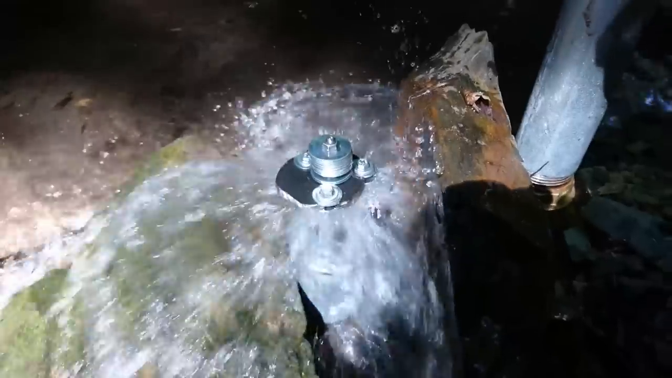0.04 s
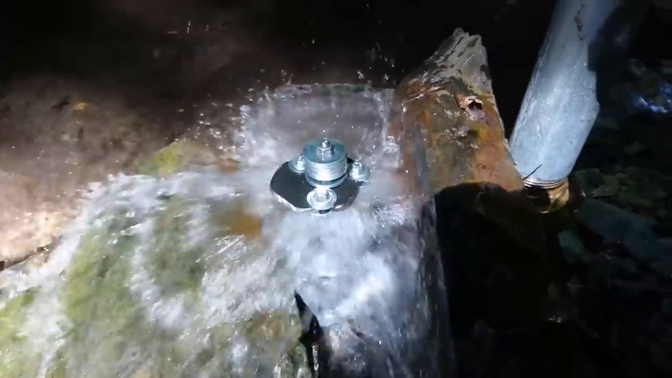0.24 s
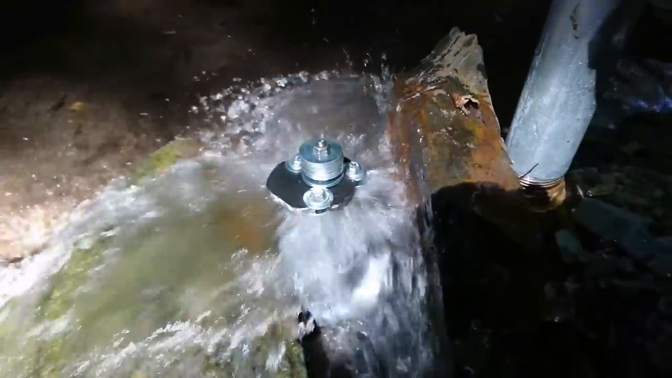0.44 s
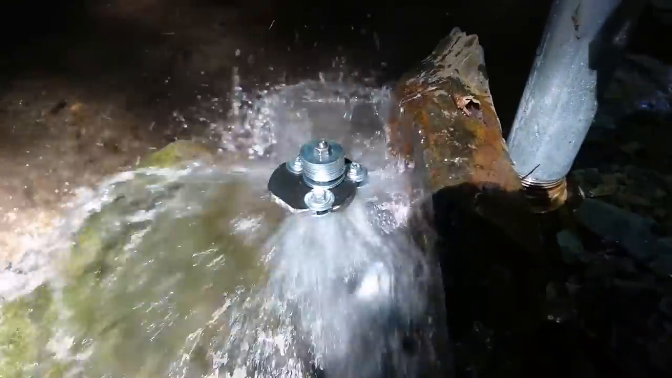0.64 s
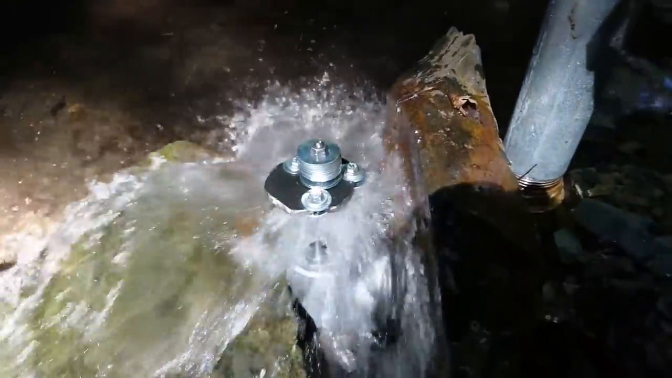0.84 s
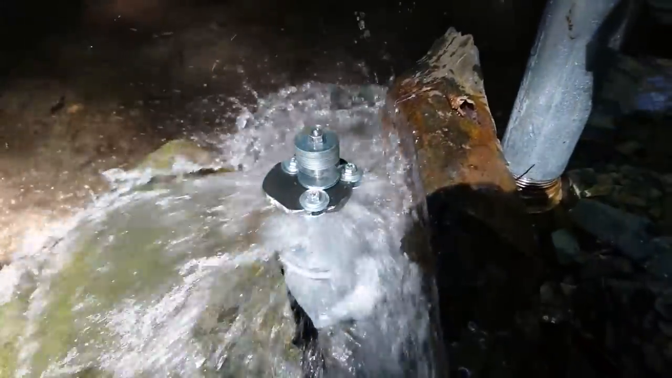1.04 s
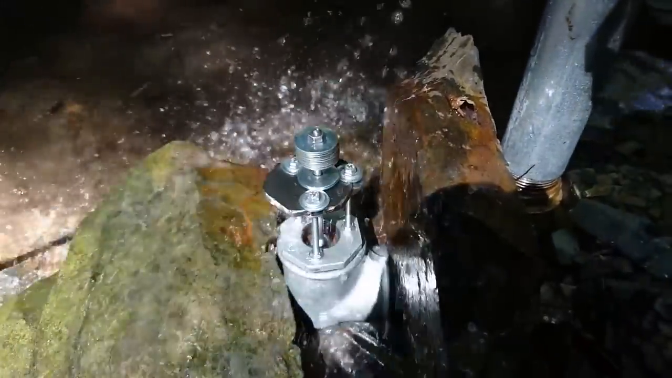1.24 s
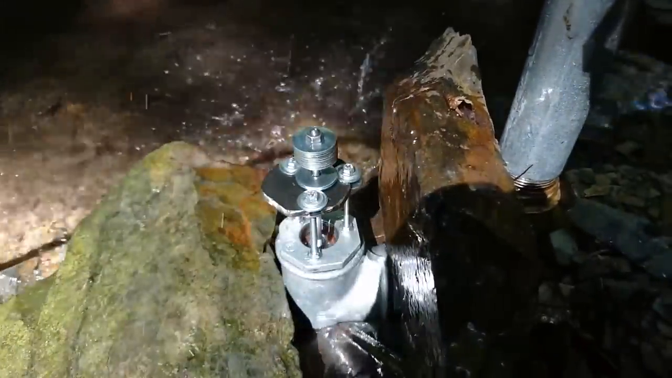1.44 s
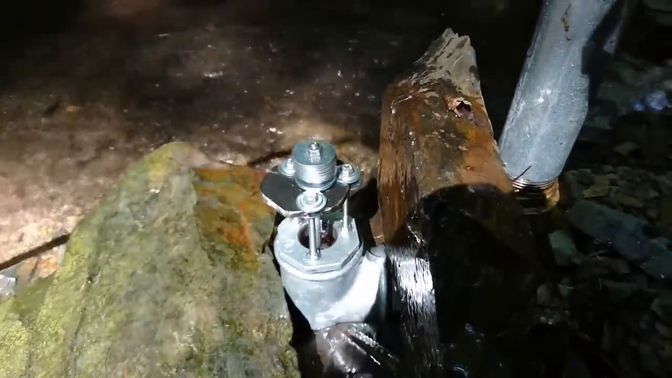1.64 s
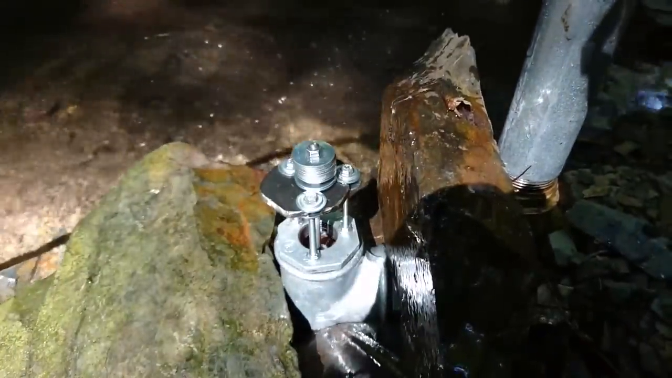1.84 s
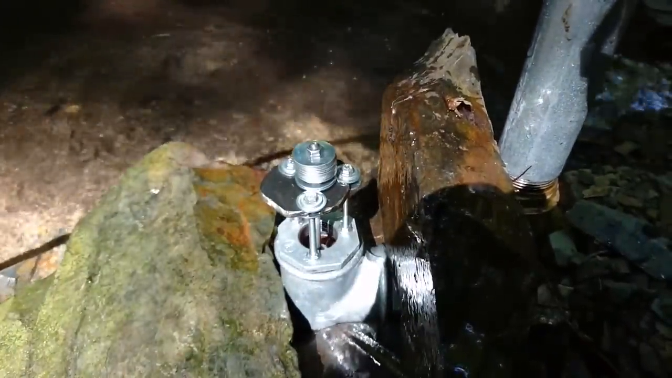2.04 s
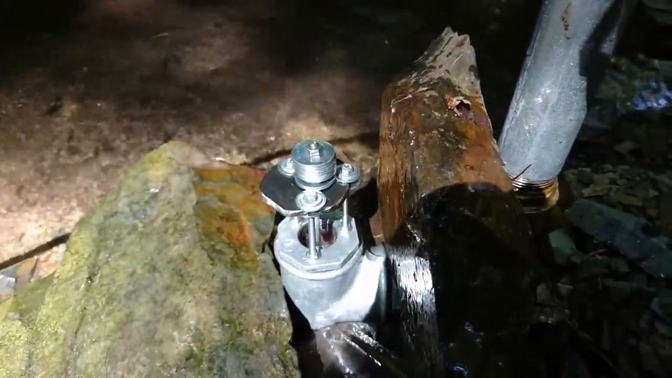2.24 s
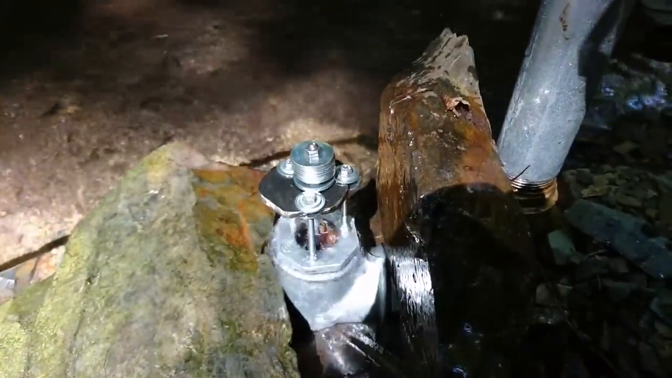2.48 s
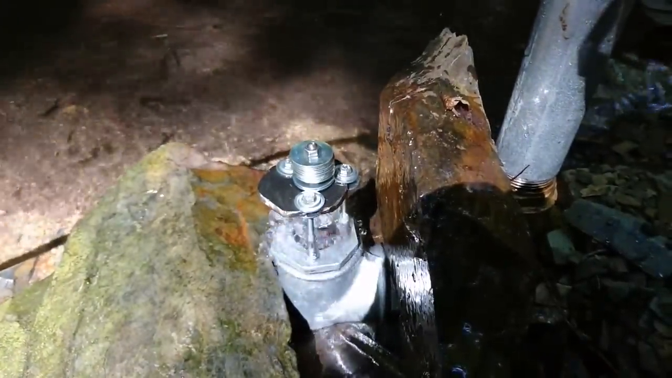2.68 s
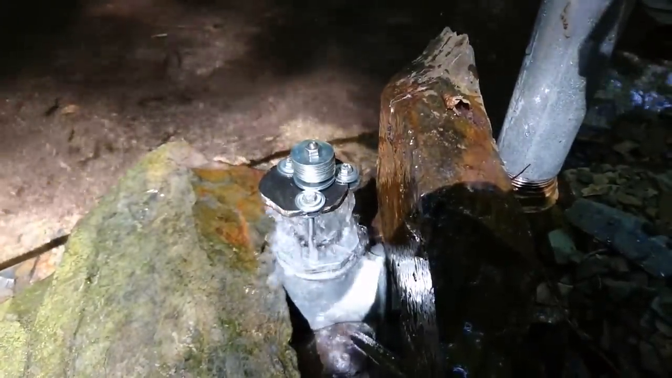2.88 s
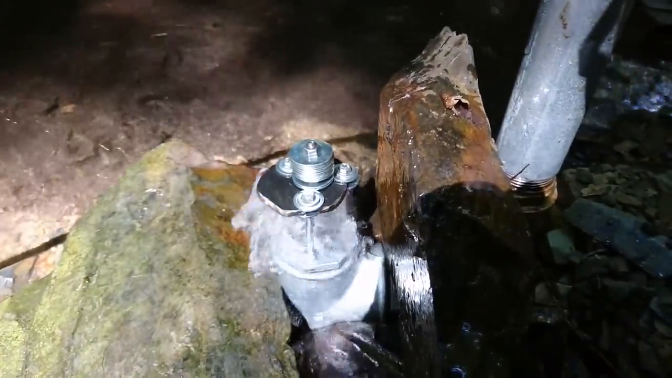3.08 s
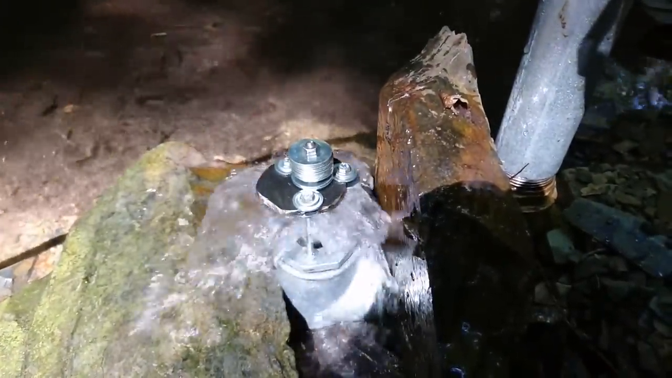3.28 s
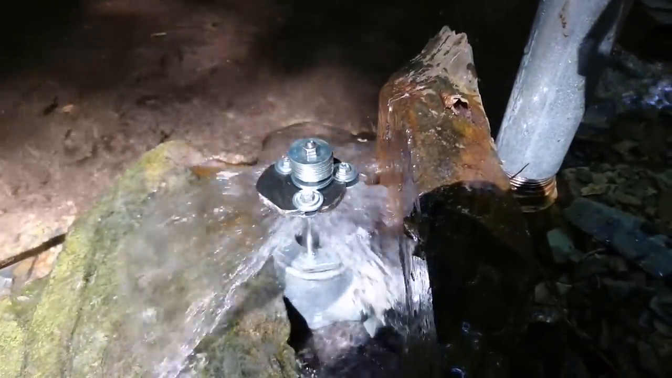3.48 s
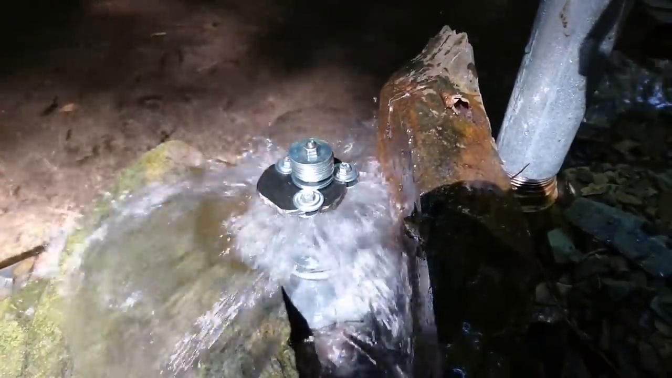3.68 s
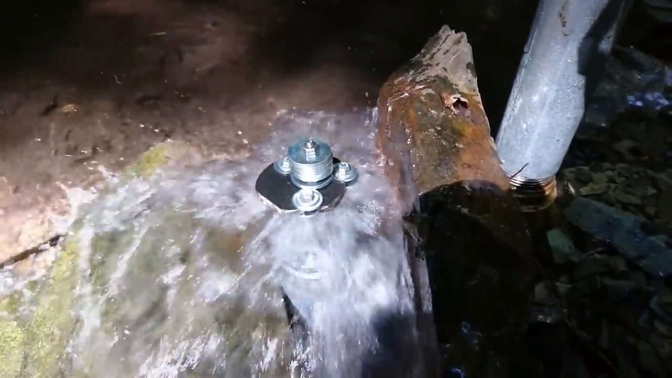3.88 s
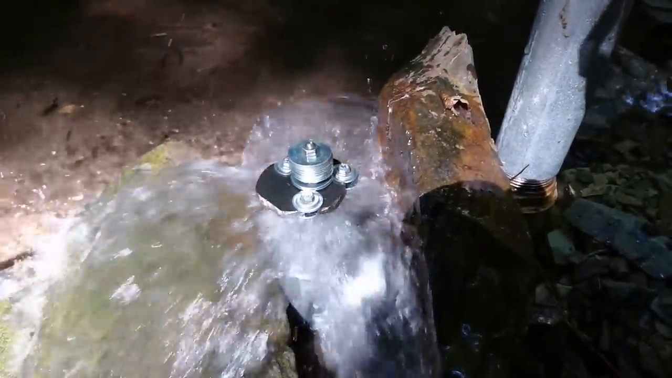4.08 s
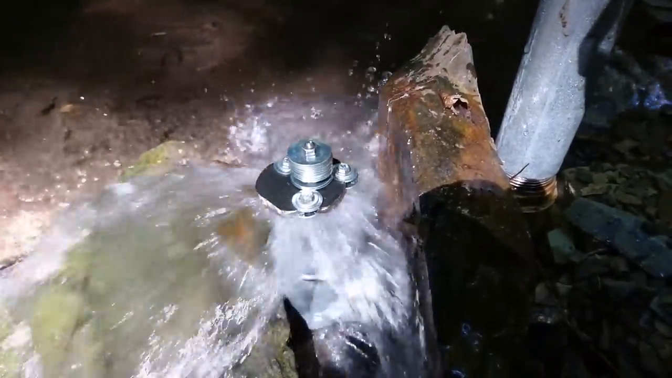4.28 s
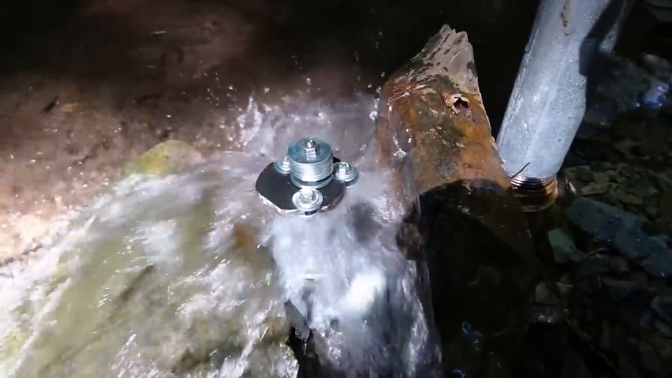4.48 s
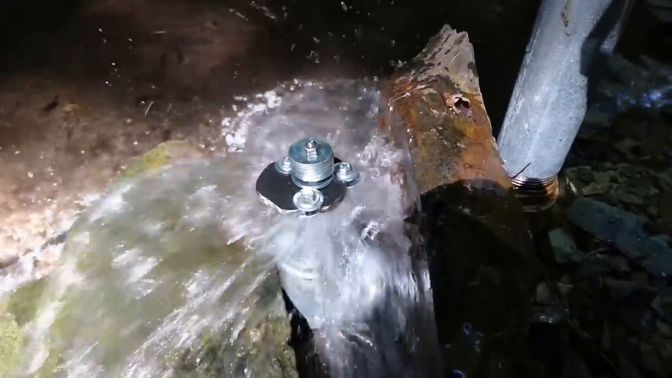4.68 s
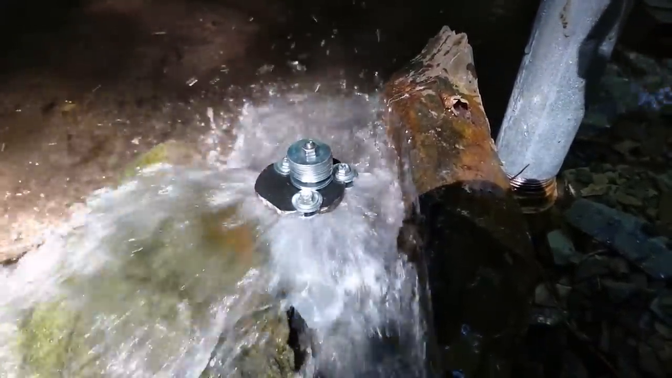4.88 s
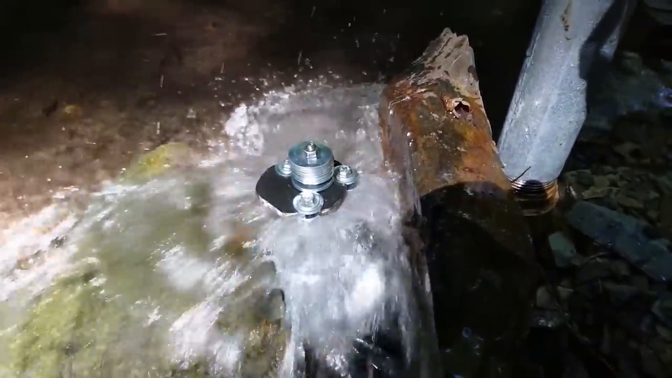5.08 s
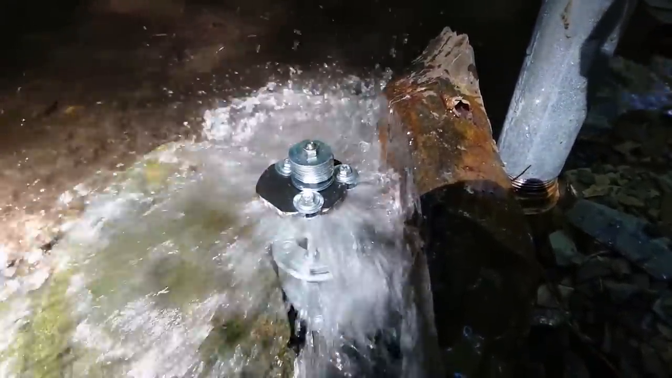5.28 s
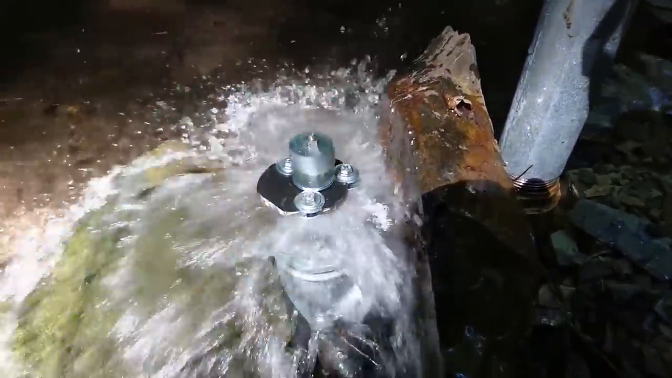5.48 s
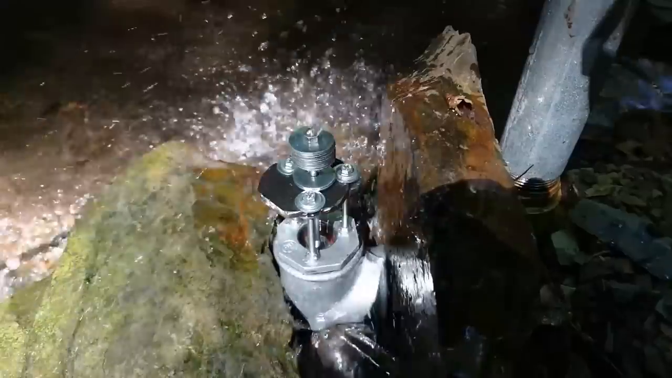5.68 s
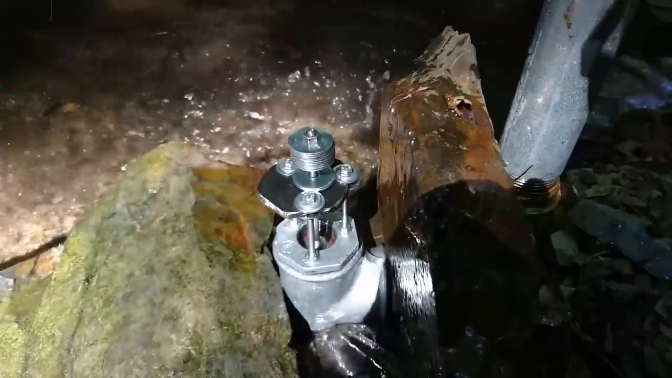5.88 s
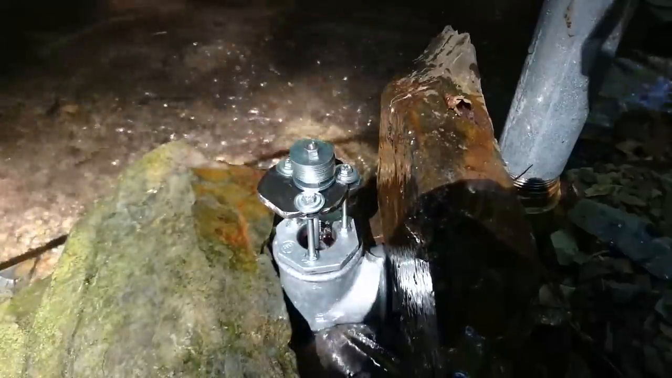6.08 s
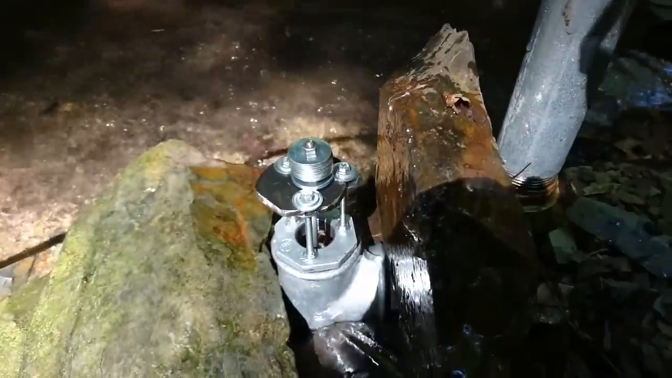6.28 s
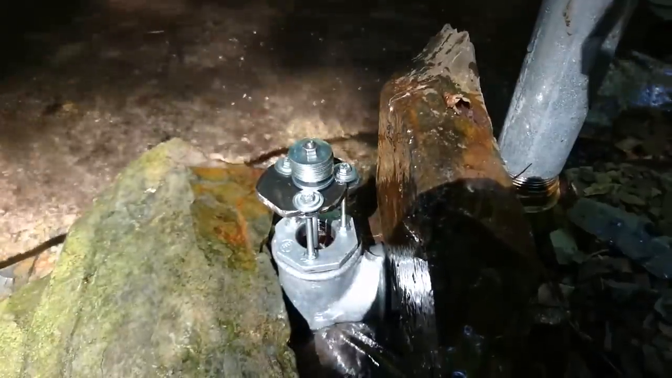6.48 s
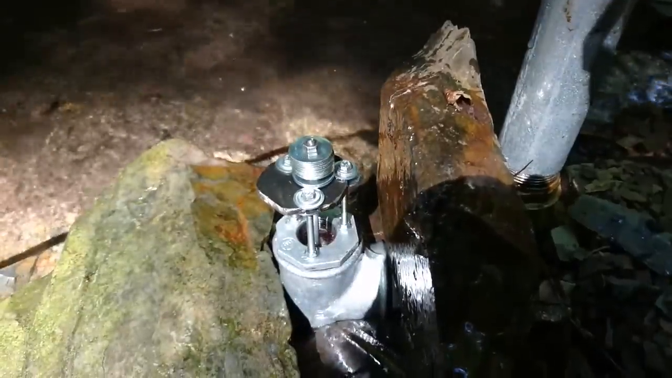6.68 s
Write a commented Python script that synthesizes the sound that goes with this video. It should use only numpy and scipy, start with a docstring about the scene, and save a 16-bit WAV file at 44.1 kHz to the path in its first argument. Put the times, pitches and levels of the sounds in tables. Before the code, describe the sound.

A pump valve spews hissing, splashing water, knocks shut with a thump and gulp, rattles open in near quiet, then repeats the cycle.

```python
"""Beside a creek: a ram pump gushes over stones until its waste valve slams shut with a knock, thump and gulp.
The spray falls back, loose weights clatter on the stem as the valve drops open, and the gush builds again.
Water is filtered noise and ringing impacts, bubbles are rising sines, metal is a set of struck resonances.
Rumble, murmur and a wandering hum lie below. Two small microphone ports listen, the left nearer the valve."""
import sys
import numpy as np
from scipy import signal
from scipy.fft import rfft, irfft, next_fast_len
from scipy.io import wavfile
from scipy.ndimage import uniform_filter1d

SR = 44100
rng = np.random.default_rng(int(sys.argv[2]) if len(sys.argv) > 2 else 0)


def master_out(mix):
    """Clip the mix to full scale and print it as 16-bit PCM to the path in sys.argv[1]."""
    frames = np.transpose(np.atleast_2d(mix))
    ceiling = np.clip(frames, -1, 1)
    pcm = np.round(ceiling * 32767).astype(np.int16)
    wavfile.write(sys.argv[1], SR, pcm)


N = 296572  # length in samples

# Surges and lulls of the gush, before its random surging: [t/s, spray level/dB, gurgle level/dB]
GUSH_CURVE = [(0.0, -36, -36.5), (0.15, -37, -42), (0.3, -37, -40), (0.47, -38.5, -41), (0.65, -36, -43),
              (0.75, -37, -42.5), (0.99, -34.5, -36), (1.1, -34.5, -40.5), (1.19, -39.5, -39.5),
              (1.3, -37, -50), (1.36, -44, -52), (1.43, -54.5, -57.5), (1.65, -59.5, -53.5),
              (1.85, -63, -60), (2.1, -70, -64.5), (2.56, -71.5, -65.5), (2.68, -61.5, -58),
              (2.74, -60.5, -49.5), (2.9, -56.5, -52.5), (3.0, -55.5, -50), (3.19, -53.5, -48),
              (3.27, -47, -43), (3.38, -49, -47), (3.45, -48.5, -50), (3.53, -46.5, -48),
              (3.66, -50.5, -51), (3.8, -43, -44.5), (3.93, -42.5, -46.5), (4.0, -39, -46.5),
              (4.25, -40.5, -42.5), (4.38, -36.5, -42.5), (4.47, -37.5, -38), (4.56, -39.5, -42.5),
              (4.8, -35, -42), (4.98, -41, -44), (5.04, -34.5, -39), (5.25, -37, -44.5),
              (5.45, -34.5, -39.5), (5.58, -32.5, -42), (5.64, -38.5, -52), (5.79, -40.5, -47),
              (5.84, -49, -60), (5.95, -62, -58), (6.1, -57.5, -54), (6.28, -64, -63), (6.45, -70, -68),
              (6.72, -69, -63.5)]
# Short dips in the spray level, of one common width: [t/s, depth/dB]
SPRAY_DIPS = [(.01, 4), (.13, 3), (.472, 4.5), (.79, 4.5), (1.07, 4), (1.177, 2), (1.225, 4), (1.385, 6),
              (1.455, 5), (2.888, 4), (3.003, 4), (3.043, 3), (3.12, 6), (3.183, 7), (3.407, 3), (3.437, 7),
              (3.672, 3), (3.776, 4.5), (3.831, 3.5), (3.906, 4), (3.963, 3), (4.036, 6), (4.115, 3.5),
              (4.25, 3), (4.35, 4), (4.605, 2), (5.068, 3.5), (5.203, 2.5), (5.363, 5), (5.478, 4),
              (5.69, 5), (5.828, 5)]
# Colour of the water itself: [f/Hz, level/dB]
WATER_COLOUR = [(400, 4.5), (1500, 1.5), (4000, 1), (8000, 3.5), (11000, 3.5), (15000, 11)]
# Low sound of creek and pipe, before its drift: [t/s, rumble level/dB, murmur level/dB]
LOW_CURVE = [(0.0, -63, -61.5), (0.32, -70, -61.5), (0.65, -60, -59.5), (0.95, -65, -63),
             (1.25, -54.5, -60.5), (1.8, -59, -63), (2.4, -61.5, -64.5), (2.85, -65.5, -61.5),
             (3.4, -55, -57.5), (4.05, -60, -57), (4.55, -64, -58), (4.95, -63, -61), (5.3, -61.5, -56.5),
             (5.62, -57.5, -62), (5.95, -67.5, -62), (6.3, -59, -60), (6.72, -60.5, -60)]
# Spectral shape of the rumble, loudness set later: [f/Hz, relative level/dB]
RUMBLE_COLOUR = [(30, -70), (50, 1.5), (95, 6.5), (170, 1.5), (260, -2.5), (340, -48.5)]
# Spectral shape of the murmur, loudness set later: [f/Hz, relative level/dB]
MURMUR_COLOUR = [(200, -15.5), (300, -2.5), (420, 2.5), (650, 1), (850, -7), (1100, -21), (1600, -29),
                 (2200, -47)]
# Wandering hum, before its swelling: [t/s, f/Hz, level/dB]
HUM_CURVE = [(0, 85, -78), (.4, 85.6, -70), (.7, 105, -57), (.95, 99.6, -81), (1.17, 100, -55),
             (1.3, 79.3, -57), (1.6, 100, -71), (1.75, 107.2, -57), (1.88, 89.8, -61), (2.05, 97.2, -59),
             (2.35, 85.8, -59), (2.55, 100, -66), (2.75, 74.9, -67), (2.9, 90.2, -73), (3.05, 96.4, -65),
             (3.4, 94.6, -60), (3.55, 107.1, -59), (3.75, 94.6, -71), (3.95, 95, -53.5), (4.15, 110.2, -70),
             (4.35, 108.6, -56.5), (4.55, 117.2, -70), (4.9, 85.6, -71), (5.08, 82, -57.5),
             (5.35, 106, -58.5), (5.6, 85.6, -70), (5.9, 89.2, -75), (6.33, 86.7, -67), (6.45, 92, -73),
             (6.55, 99.4, -63), (6.72, 118, -68)]
# Loudest bubbles and gulps, with a few pitched splashes: [t/s, level/dB, starting f/Hz, t60/s]
LOUD_BUBBLES = [(0.059, -27.5, 1480, 0.024), (0.1, -47, 1020, 0.14), (0.025, -22, 3470, .02),
                (0.358, -27, 4400, .03), (0.412, -20.5, 1480, 0.011), (0.504, -30, 1500, 0.02),
                (0.533, -31.5, 1100, 0.035), (0.581, -25, 2200, 0.017), (0.664, -22, 6230, 0.012),
                (0.674, -19.5, 2650, .04), (0.684, -24, 4450, .015), (0.727, -31, 1530, .022),
                (0.738, -37.5, 900, 0.03), (0.8116, -23.5, 4700, 0.013), (0.979, -31, 1630, 0.07),
                (1.047, -19.5, 1520, 0.022), (1.293, -34, 1650, 0.02), (1.408, -54, 1460, 0.046),
                (1.504, -46, 1290, 0.06), (1.522, -50, 1310, .06), (1.57, -48, 1500, 0.043),
                (1.681, -27, 856, 0.037), (1.735, -42, 900, 0.078), (1.755, -40.5, 850, .029),
                (2.046, -54, 1100, 0.046), (2.319, -42.5, 1000, 0.023), (2.323, -45, 1454, 0.031),
                (2.358, -52, 940, .05), (2.729, -43, 970, 0.046), (2.736, -40, 1500, .055),
                (2.754, -44, 1010, 0.059), (2.832, -49, 700, .03), (2.85, -50, 1610, .025),
                (2.986, -42, 2100, 0.013), (3.038, -47, 1020, .035), (3.091, -41.5, 1544, 0.075),
                (3.112, -44, 1480, 0.052), (3.11, -47, 990, 0.046), (3.165, -47, 1000, 0.043),
                (3.176, -42, 1130, 0.04), (3.182, -44, 1500, 0.027), (3.301, -40, 1500, 0.048),
                (3.33, -51, 1450, .04), (3.482, -40.5, 1615, 0.026), (3.72, -40.5, 1660, .03),
                (3.858, -29.5, 1639, 0.033), (3.898, -45, 1021, 0.12), (3.929, -34.5, 1580, 0.036),
                (4.018, -33.5, 1340, 0.026), (4.166, -31, 1382, 0.016), (4.318, -26, 1320, 0.0077),
                (4.371, -33, 1730, 0.029), (4.403, -30.5, 1920, 0.026), (4.489, -36, 703, 0.047),
                (4.763, -37, 1750, 0.045), (5.081, -29.5, 1570, 0.028), (5.122, -34, 1540, .061),
                (5.142, -29, 1566, 0.011), (5.248, -29, 1600, .028), (5.405, -37, 1500, 0.05),
                (5.492, -20, 1590, 0.01), (5.574, -26, 926, 0.048), (5.795, -34, 1120, 0.059),
                (5.962, -51, 1400, .03), (6.131, -30, 740, 0.022), (6.14, -45, 1300, 0.095),
                (6.435, -58, 1870, 0.046), (6.478, -56, 1900, 0.042)]
# Loudest splashes on the stones: [t/s, level/dB, f/Hz, left over right level/dB, t60/s]
LOUD_SPLASHES = [(0.0321, -14.5, 3830, 6.5, 0.023), (0.1189, -28, 5270, -1.0, 0.015),
                 (0.1778, -23, 7150, -1, 0.023), (0.2161, -20.0, 3280, 8, 0.024),
                 (0.2464, -18, 4740, -1.0, 0.024), (0.2571, -20.5, 4090, 1, 0.037),
                 (0.273, -16, 2950, 2, 0.014), (0.2955, -20, 4180, 0.0, 0.054),
                 (0.3039, -18, 4870, -5.0, 0.026), (0.321, -28, 3490, -0.5, 0.015),
                 (0.3446, -18.5, 4390, -2, 0.036), (0.3833, -16, 4050, -4, 0.014),
                 (0.412, -17.5, 3880, -1, 0.011), (0.4324, -21.5, 4840, 2.5, 0.04),
                 (0.4842, -20, 4050, -3, 0.05), (0.508, -17, 3880, 1.0, 0.016),
                 (0.5212, -20, 2630, 8, 0.013), (0.5326, -20, 2840, 4, 0.012),
                 (0.617, -11, 4500, -3, 0.015), (0.6581, -11, 3495, -2.5, 0.022),
                 (0.7222, -22, 7150, 2, 0.016), (0.7349, -21.0, 3700, 3, 0.039),
                 (0.7621, -25, 4950, -6, 0.012), (0.8154, -14.5, 4960, 1, 0.011),
                 (0.827, -23, 4260, -0.5, 0.018), (0.8982, -15, 4780, -3, 0.012),
                 (0.9134, -28, 6760, -1.5, 0.013), (0.9702, -19, 3570, 0, 0.012),
                 (1.0216, -17, 3730, 2.0, 0.052), (1.0489, -26, 2930, 3, 0.038),
                 (1.2109, -26, 3620, 0.5, 0.036), (1.2725, -23, 4670, -4.0, 0.032),
                 (1.2833, -21.0, 4260, -4, 0.012), (1.2967, -16.5, 4220, 0, 0.029),
                 (1.3056, -25, 4780, -3.0, 0.012), (1.3407, -23, 3270, 10, 0.012),
                 (1.3692, -27, 3380, 6, 0.014), (1.387, -38, 4950, -2.0, 0.012),
                 (1.405, -32, 2900, -5, 0.039), (1.4131, -28, 4750, -1.0, 0.02),
                 (1.4859, -30, 4050, -3, 0.014), (1.503, -28.5, 3160, -2.5, 0.027),
                 (1.5679, -43, 1940, -1.0, 0.038), (1.5756, -41.5, 4780, -6, 0.031),
                 (1.6432, -38, 3920, -1.5, 0.02), (1.6504, -46, 2535, 2.0, 0.036),
                 (1.8549, -47, 4184, -7.0, 0.012), (1.8809, -38.5, 3550, 0.5, 0.028),
                 (1.9336, -52, 7280, -2.0, 0.018), (1.9728, -43, 3060, 5, 0.017),
                 (1.9988, -51, 5900, -4.5, 0.014), (2.037, -43, 3820, -0.5, 0.026),
                 (2.0468, -46, 4480, -4.5, 0.012), (2.0546, -48.5, 2130, -3, 0.043),
                 (2.0948, -45, 3920, -2.0, 0.012), (2.139, -49, 5000, -1.5, 0.013),
                 (2.2315, -52, 2150, 3, 0.024), (2.2535, -51, 2540, -0.5, 0.026),
                 (2.2948, -47, 2920, -0.5, 0.012), (2.3022, -44, 4250, -5.5, 0.019),
                 (2.3183, -47, 4260, -3.0, 0.012), (2.3811, -52, 1937, 5, 0.031),
                 (2.4427, -54, 4130, -4.5, 0.013), (2.4524, -46, 3490, 6, 0.014),
                 (2.5092, -48, 5180, -3.5, 0.02), (2.5177, -49, 3600, 5, 0.079),
                 (2.5606, -46, 4650, -6.5, 0.025), (2.6015, -49, 2800, -3, 0.047),
                 (2.6354, -40.5, 4090, -5, 0.014), (2.6496, -38, 4156, -0.5, 0.045),
                 (2.6654, -46.0, 3450, 5, 0.014), (2.688, -41, 4870, -1.0, 0.02),
                 (2.7537, -41.0, 3450, 2.0, 0.014), (2.7655, -44, 3230, 4.0, 0.013),
                 (2.7889, -36, 3830, -1, 0.038), (2.8139, -34, 3720, 3, 0.021),
                 (2.8486, -32, 3820, 3.0, 0.026), (2.9061, -38, 3360, 2.5, 0.012),
                 (2.9345, -38, 2580, 1.5, 0.038), (2.9589, -34.5, 5040, -1.5, 0.031),
                 (2.9785, -32, 3260, 2, 0.012), (2.9865, -34, 2070, 1, 0.036),
                 (3.0212, -30.5, 3720, 1.5, 0.022), (3.054, -33, 4550, 2, 0.012),
                 (3.072, -39, 7150, -2, 0.026), (3.0858, -33, 3920, 6.5, 0.019),
                 (3.1076, -45, 2970, 0.0, 0.012), (3.1668, -29.5, 3670, 2, 0.018),
                 (3.246, -28, 3960, 4, 0.014), (3.3683, -28.5, 3750, -1, 0.037),
                 (3.3823, -28.5, 7020, -2, 0.02), (3.4207, -22.5, 3730, 7.5, 0.013),
                 (3.483, -26, 3700, 1.5, 0.026), (3.5121, -24.5, 3250, 1.5, 0.02),
                 (3.5221, -29, 3565, 4.5, 0.022), (3.5959, -36, 2240, -1, 0.041),
                 (3.6821, -27.5, 5040, -3.0, 0.048), (3.6943, -24, 4200, -4, 0.033),
                 (3.7024, -33, 4300, -2.5, 0.043), (3.7843, -27, 3660, 2, 0.016),
                 (3.7989, -28.5, 3400, 5, 0.014), (3.814, -25, 3320, -3, 0.024),
                 (3.8425, -23, 3910, 0.0, 0.016), (3.8531, -21.5, 5040, -1.0, 0.027),
                 (3.8601, -27, 2056, 2.5, 0.012), (3.8734, -23, 4520, -7, 0.019),
                 (3.9487, -31, 4820, -1.0, 0.064), (3.9933, -19, 3530, 2.5, 0.014),
                 (4.0096, -20.5, 2800, 0, 0.012), (4.0773, -29, 3710, -2, 0.025),
                 (4.0877, -21, 4400, 0, 0.012), (4.101, -25, 3660, -1.0, 0.015),
                 (4.1409, -30, 4950, -2, 0.014), (4.1585, -22, 3790, 1.5, 0.043),
                 (4.1671, -20.5, 2860, 0.0, 0.015), (4.1917, -27, 3770, 4, 0.037),
                 (4.2928, -18.5, 3750, -1, 0.019), (4.303, -25.0, 3960, 0.5, 0.017),
                 (4.3579, -22.0, 3620, -4, 0.026), (4.3668, -14, 3770, -4, 0.017),
                 (4.4039, -30, 1980, -3, 0.024), (4.4386, -25, 5150, -2.5, 0.014),
                 (4.5325, -18, 4910, -5, 0.012), (4.5412, -18, 4350, 0, 0.038),
                 (4.5556, -16.5, 5040, 0, 0.014), (4.5678, -22.5, 3750, 1, 0.021),
                 (4.5773, -18.5, 3790, 2, 0.012), (4.5895, -24, 5000, -7, 0.015),
                 (4.6438, -32, 4290, -2.0, 0.012), (4.688, -17, 3620, -2, 0.012),
                 (4.7029, -20, 3790, 2.5, 0.038), (4.7267, -10.5, 4310, -6, 0.038),
                 (4.7638, -30, 2045, -5, 0.039), (4.7754, -22, 3320, 4.0, 0.012),
                 (4.8124, -16, 3490, -1.0, 0.027), (4.8372, -22, 3500, 4, 0.074),
                 (4.8552, -15.5, 4310, -5, 0.023), (4.8822, -25, 3720, -1.0, 0.013),
                 (4.9355, -28, 7450, -5, 0.013), (4.9469, -26, 4130, 0, 0.024),
                 (4.9543, -25, 5990, -6.0, 0.019), (5.0115, -18, 5530, 4, 0.012),
                 (5.0247, -14, 4440, -3, 0.025), (5.0337, -20.5, 3870, -4, 0.014),
                 (5.103, -18, 4300, -3, 0.03), (5.1202, -20.0, 4910, -4, 0.05),
                 (5.1336, -19.0, 4070, -6, 0.012), (5.1774, -17, 3700, 5.0, 0.015),
                 (5.1928, -14, 3620, -5, 0.014), (5.2141, -16, 4880, -4, 0.014),
                 (5.2356, -17, 4350, 1.0, 0.046), (5.2656, -18, 4520, 2, 0.021),
                 (5.2972, -19, 3694, 8, 0.054), (5.3339, -20.5, 2630, 1.5, 0.024),
                 (5.3835, -13, 4370, 4, 0.012), (5.3931, -27, 4020, 0.5, 0.014),
                 (5.4124, -17.5, 3736, 5, 0.019), (5.4458, -21, 3590, 2.0, 0.015),
                 (5.4652, -19.5, 4025, -1, 0.029), (5.5069, -14, 3790, 1, 0.011),
                 (5.5626, -21, 3010, 3, 0.024), (5.5695, -14, 3870, -3, 0.023),
                 (5.6559, -25.0, 4570, -3.5, 0.011), (5.6674, -14.5, 3830, 2, 0.012),
                 (5.71, -26, 3790, -2, 0.03), (5.7255, -22, 3300, 0.0, 0.026),
                 (5.7432, -25, 7000, 1, 0.046), (5.7536, -23, 2830, 4, 0.028),
                 (5.7657, -22, 3820, 3.0, 0.022), (5.7742, -25.5, 3800, 4, 0.013),
                 (5.8662, -29.5, 3700, 2, 0.026), (5.9073, -40, 4960, -5, 0.027),
                 (5.9214, -32.5, 2540, 0, 0.025), (5.9641, -32.5, 6140, -3, 0.016),
                 (5.9855, -34.5, 3350, -7, 0.025), (6.0197, -40.5, 1940, -2, 0.024),
                 (6.033, -40.0, 4820, -4, 0.027), (6.3303, -50.0, 3076, 4.5, 0.012),
                 (6.3408, -39, 3820, 3.0, 0.017), (6.4105, -49.0, 4180, -5.5, 0.031),
                 (6.4342, -52, 1950, 0, 0.011), (6.4778, -61, 1940, -2.5, 0.038),
                 (6.5289, -55, 2150, 4, 0.016), (6.5753, -50.0, 4740, 0.0, 0.016),
                 (6.5903, -42.5, 5990, -3, 0.012), (6.6336, -49, 4630, -1.0, 0.012),
                 (6.6411, -47, 3480, 6, 0.044), (6.6522, -50, 2870, 1.0, 0.016)]
# The valve slams on its seat: [t/s, relative level/dB]
VALVE_SLAMS = [(1.136, -19.5), (5.5843, -19)]
# Resonances of the hard knock: [f/Hz, relative level/dB, t60/s]
KNOCK_MODES = [(395, -19.5, 0.016), (611, -4.5, 0.0046), (970, -14.5, 0.017), (1480, -13.5, 0.0054),
               (2700, -2, 0.0086)]
# Resonances of the soft thump: [f/Hz, relative level/dB, t60/s]
THUMP_MODES = [(94, -27, 0.1), (163.7, 0, 0.12), (268, -5.5, 0.036)]
# The valve drops open: [t/s, relative level of the tick/dB, relative level of the body jolt/dB]
VALVE_DROPS = [(1.6777, 1, -36), (6.1258, 3, -32)]
# Low ring of the body as the valve drops: [f/Hz, relative level/dB, t60/s]
JOLT_MODES = [(179.7, -4.5, 0.1), (420, 1.5, 0.047)]
# Contacts of the clattering weights: [t/s, level/dB, t60/s, strongest f/Hz]
WEIGHT_CONTACTS = [(1.6779, -10.5, 0.016, 2600), (1.679, -20.5, 0.025, 6050), (1.684, -13, 0.03, 3450),
                   (1.6908, -20, 0.018, 5550), (1.706, -25, 0.078, 4900), (1.7228, -14, 0.056, 3970),
                   (1.7292, -13, 0.022, 2150), (1.7305, -16, 0.016, 5670), (1.734, -18, .02, 4500),
                   (1.742, -31, .05, 2200), (1.748, -26, 0.036, 4950), (1.7533, -20.5, 0.03, 5000),
                   (1.7658, -16, 0.02, 4880), (1.771, -26.5, 0.088, 2620), (6.1267, -20, 0.015, 2700),
                   (6.1279, -9.5, 0.018, 4300), (6.133, -19.5, 0.03, 6900), (6.139, -22, 0.022, 6270),
                   (6.146, -22.5, 0.042, 5230), (6.151, -21, 0.02, 2780), (6.1645, -22, 0.019, 4950),
                   (6.168, -19, 0.03, 4800), (6.1735, -11, 0.024, 3860), (6.174, -16, 0.025, 5370),
                   (6.1754, -15, 0.031, 2460), (6.179, -16, 0.018, 4900), (6.1932, -20.5, 0.04, 4950),
                   (6.204, -23, 0.025, 4860), (6.211, -24, 0.076, 4920), (6.216, -31, 0.039, 4900),
                   (6.223, -36, 0.09, 4900)]
# Ring shared by all weights: [f/Hz, relative level/dB, t60/s]
WEIGHT_MODES = [(2150, -38, 0.05), (2650, -48, 0.03), (4900, -49, 0.066), (5770, -60, 0.04),
                (6900, -60, 0.05)]
# Colour of each microphone port: [f/Hz, left level/dB, right level/dB]
PORT_COLOUR = [(400, -20, -23.5), (900, -14, -17.5), (1040, -13.5, -15.5), (1500, -7.5, -10),
               (2023, -10.5, -13.5), (2780, -4, -4), (3230, -1.5, -7.5), (3820, 2.5, -3.5),
               (4300, -2.5, 3.5), (4700, 3, -3.5), (5420, -16, 0), (6050, 2, -9), (6340, -13, 5.5),
               (6570, -1, -7), (8660, -24, -7.5), (9550, -6, -9.5), (11300, -16, -12.5), (11200, -31, -21),
               (12500, -17, -19), (14300, -25, -16.5), (15000, -28, -32)]
# Ways from the gush to the ports: [lag of the right port/ms, level/dB]
GUSH_PATHS = [(0.165, -2.5), (0.399, -5), (0.679, -2)]

DIP_HALF_WIDTH_S = 0.011
SCATTERED_DB = 1  # gush streams that differ between the ports
CREEK_DB, CREEK_LATE_MS, CREEK_TOP_HZ = -67.5, 0.458, 9400
SIDE_SPREAD_DB = 5  # random left or right lean
TICK_TOP_HZ = 5900  # keeps a bubble's tick dull
SMALL_BUBBLES, SMALL_BUBBLE_T60_S = 70, 0.035
SMALL_BUBBLE_DB = 3  # over the gurgle curve, before random spread
SMALL_SPLASHES, SPLASH_T60_S = 30, 0.027
SMALL_SPLASH_DB = 8  # over the spray curve, before random spread
DRIP_DB = -58.5  # floor that keeps small splashes going as drips, before random spread
WASH_DB, WASH_T60_S = -9.5, 0.07  # softer spray with each splash
THUMP_DB, SPURT_DB = -19.5, 8  # against the slam level
# A second blow follows each slam; its changes are against the first
BOUNCE_S, BOUNCE_KNOCK_DB, BOUNCE_THUMP_DB, BOUNCE_SPURT_DB = 0.0155, 3, -1, -8
GULP_DB, GULP_FROM_HZ, GULP_TO_HZ = -9, 700, 860
GULP_RISE_S, GULP_HOLD_S, GULP_T60_S = 0.0044, 0.0076, 0.0059
TICK_DB, TICK_RISE_S, TICK_T60_S, TICK_HZ = -6.5, 0.00007, 0.008, 3050  # first touch of the weights
CONTACT_RISE_S, BRIGHT_FROM_HZ = 0.001, 750
JOLT_DB = -9.5  # low ring against the jolt
CUTOFF_HZ = 16300


def amp(db):
    """Turns decibels into gain."""
    return 10 ** (np.asarray(db) / 20)


def rms_one(x):
    """Scales a signal to rms 1."""
    return x / np.sqrt(np.mean(x ** 2) + 1e-20)


def in_time(rows):
    """Draws the columns of a curve table as one value a sample."""
    s, *columns = np.transpose(rows)
    return [np.interp(np.arange(N) / SR, s, column) for column in columns]


def drift(rate_hz):
    """Slow random wandering of rms 1: noise through two equal poles, made at an eighth of the sample rate."""
    pole = np.exp(-16 * np.pi * rate_hz / SR)
    white = rng.standard_normal(N // 8 + 4002)
    slow = signal.lfilter([1], [1, -2 * pole, pole * pole], white)[4000:]  # drop the run-in
    return np.interp(np.arange(N) / 8, np.arange(len(slow)), rms_one(slow))


def ring(clicks, hz, t60):
    """A resonator: a unit click sets off a decaying sine that starts from height 1."""
    r, w = amp(-60 / (t60 * SR)), 2 * np.pi * hz / SR
    return signal.lfilter([0, np.sin(w)], [1, -2 * r * np.cos(w), r * r], clicks + 1e-18)


def coloured(x, hz, db, late_ms=0.):
    """Minimum-phase filter of the given spectrum, built by folding the cepstrum, with a delay."""
    size = next_fast_len(N + 4096)
    grid = np.arange(4097) * SR / 8192
    curve_db = np.interp(np.log(grid + 1), np.log(hz), db)
    cepstrum = irfft(np.log(amp(curve_db)))
    cepstrum[1:4096] *= 2
    cepstrum[4097:] = 0
    impulse = irfft(np.exp(rfft(cepstrum)))[:4096]
    response = rfft(impulse, size)
    bins_hz = np.arange(len(response)) * SR / size
    delay = np.exp(-2j * np.pi * bins_hz * late_ms / 1000)
    return irfft(rfft(x, size) * response * delay, size)[..., :N]


def add(out, s, sound):
    """Drops a sound into the mix at a time."""
    at = round(s * SR)
    out[..., at:at + sound.shape[-1]] += sound[..., :N - at]


def burst(t60, rise_s):
    """Noise that swells quickly and dies away."""
    t = np.arange(4000) / SR
    decay = amp(-60 * t / max(t60, .004))
    return rng.standard_normal(len(t)) * (1 - np.exp(-t / rise_s)) * decay


def port_gain(hz):
    """Gain of the ports at a pitch, from their mean in dB."""
    table_hz, left_db, right_db = np.transpose(PORT_COLOUR)
    return amp(np.interp(np.log(hz), np.log(table_hz), (left_db + right_db) / 2))


def puff(hz, rise_s, t60, cycles, broad_db, apart):
    """Noise burst ringing at a pitch, partly different at each port; peak 1 before undoing the port gain."""
    noise = burst(t60, rise_s) + apart * np.array([burst(t60, rise_s), burst(t60, rise_s)])
    tone = ring(noise, hz, cycles / hz)
    sound = tone / abs(tone).max() + amp(broad_db) * noise / abs(noise).max()
    return sound / abs(sound).max() / port_gain(hz)


def droplets(per_s, spread_db, low_hz, high_hz, cycles):
    """Random impacts ring a few cycles at twelve pitches, each pitch in its own flurries; rms 1."""
    sizes = amp(spread_db * np.minimum(rng.exponential(1, N), 4.5)) * rng.choice([-1, 1], N)
    clicks = sizes * (rng.random(N) < per_s / SR)
    dealt = rng.integers(0, 12, N)
    flurry = amp(1.74 * drift(28))
    total = np.zeros(N)
    for k, hz in enumerate(np.geomspace(low_hz, high_hz, 12)):
        impacts = clicks * (dealt == k) * np.roll(flurry, k * N // 12)
        total += ring(impacts, hz, cycles / hz) * np.sqrt(hz)
    return rms_one(total)


def flow():
    """Spray and gurgle levels in dB; the spray level has short dips of one common width."""
    t, (spray_db, gurgle_db) = np.arange(N) / SR, in_time(GUSH_CURVE)
    dips = sum(db * np.exp(-((t - s) / DIP_HALF_WIDTH_S) ** 2) for s, db in SPRAY_DIPS)
    return spray_db - dips, gurgle_db


def by_chance(count, level_db, low_hz, high_hz):
    """Random events (t/s, level/dB, f/Hz) whose loudness follows a level curve."""
    draw = rng.random((count, 3))
    s = draw[:, 0] * (N - 1) / SR
    db = level_db[(s * SR).astype(int)] + 5.3 * (draw[:, 2] - .5)
    return list(zip(s, db, low_hz * (high_hz / low_hz) ** draw[:, 1]))


def gush():
    """Hiss, fizz and plops surge together in every stream; water bursting on stone briefly lifts the spray."""
    spray_db, gurgle_db = flow()
    below_peak_db = spray_db - spray_db.max()
    lumps = (rng.random(N) < 70 / SR) * np.minimum(rng.exponential(0.17, N), 0.5)
    fade = amp(-60 / (0.061 * SR))
    bursts = uniform_filter1d(signal.lfilter([1], [1, -fade], lumps), size=40)
    surge = amp(1.0 * drift(13.4)) * (1 + bursts)
    below_treble = signal.butter(4, 10500, fs=SR, output="sos")
    streams = []
    for _ in range(len(GUSH_PATHS) + 2):  # one for each path, then two scattered
        hiss = rng.standard_normal(N)
        fizz = droplets(1500, 3.3, 1900, 11000, 28.0)
        spray = amp(spray_db) * surge * (amp(-6) * hiss + fizz)
        coarse = signal.sosfilt(below_treble, spray)
        # The treble above 10.5 kHz falls a little faster than the spray level
        treble = amp(0.038 * below_peak_db) * (spray - coarse)
        plops = droplets(170, 4.2, 850, 2600, 24.0)
        streams.append(coarse + treble + amp(gurgle_db) * np.sqrt(surge) * plops)
    return coloured(np.array(streams), *np.transpose(WATER_COLOUR))


def creek():
    """Fine distant babble: noise in three parts, the first with ringing droplets, all dulled at the top."""
    white = rng.standard_normal((3, N))
    white[0] += 1.13 * droplets(760, 4.6, 970, 6500, 13.0)
    dull = signal.butter(8, CREEK_TOP_HZ, fs=SR, output="sos")
    return amp(CREEK_DB + 2.8 * drift(38)) * signal.sosfilt(dull, white)


def lows():
    """Drifting filtered noise: rumble nearly alike at both ports, murmur about half alike."""
    rumble_db, murmur_db = in_time(LOW_CURVE)
    white = rng.standard_normal((4, N))
    rumble = rms_one(coloured(white[0] + 0.24 * white[1:3], *np.transpose(RUMBLE_COLOUR)))
    murmur = rms_one(coloured(1.08 * white[3] + white[1:3], *np.transpose(MURMUR_COLOUR)))
    return amp(rumble_db + 2.0 * drift(1.95)) * rumble + amp(murmur_db + 1.77 * drift(15.5)) * murmur


def hum():
    """A soft unsteady tone, perhaps air in the pipe: sine and cosine swell at random on a wandering pitch."""
    hz, db = in_time(HUM_CURVE)
    phase = 2 * np.pi * np.cumsum(hz) / SR
    tone = (1.2 + drift(5.5)) * np.sin(phase) + drift(5.3) * np.cos(phase)
    return amp(db) * rms_one(tone)


def bubbles():
    """Bubbles and a few pitched splashes: a dull tick, then a decaying sine that rises in pitch."""
    out, t, (_, gurgle_db) = np.zeros((2, N)), np.arange(4000) / SR, flow()
    sides = SIDE_SPREAD_DB * np.array([[.5], [-.5]])
    dull = signal.butter(2, TICK_TOP_HZ, fs=SR, output="sos")
    small = by_chance(SMALL_BUBBLES, gurgle_db + SMALL_BUBBLE_DB, 906, 1875)
    small = [(*row, SMALL_BUBBLE_T60_S) for row in small]
    for s, db, hz, t60 in [*LOUD_BUBBLES, *small]:
        tone = np.sin(2 * np.pi * hz * (t + 0.63 * t ** 2))
        tone *= (1 - np.exp(-t / 0.00026)) * amp(-60 * t / t60)
        tick = signal.sosfilt(dull, puff(hz, 0.0001, 0.072, 6.5, 1.5, 1.0))
        sound = 1.23 * tone / port_gain(hz) + amp(-2.5) * tick
        add(out, s, sound * amp(db + rng.standard_normal() * sides))
    return out


def splashes():
    """Each splash on the stones is a short puff of pitched noise with a softer, slower wash."""
    out, (spray_db, _) = np.zeros((2, N)), flow()
    level_db = np.maximum(spray_db + SMALL_SPLASH_DB, DRIP_DB)
    small = by_chance(SMALL_SPLASHES, level_db, 2190, 6200)
    small = [(*row, SIDE_SPREAD_DB * rng.standard_normal(), SPLASH_T60_S) for row in small]
    for s, db, hz, pan_db, t60 in [*LOUD_SPLASHES, *small]:
        slap = puff(hz, 0.00041, t60, 21.5, 1.0, .7)
        wash = puff(hz, 0.0028, WASH_T60_S, 14.0, 1.8, 0.84)
        add(out, s, (slap + amp(WASH_DB) * wash) * amp(db + pan_db * np.array([[.5], [-.5]])))
    return out


def struck(times, levels_db, modes, soft_s):
    """A soft blow: two resonators in a row let each mode swell for a moment before it dies."""
    out, at = np.zeros(N), (np.array(times) * SR).astype(int)
    for hz, db, t60 in modes:
        clicks = np.zeros(N)
        clicks[at] = amp(levels_db + db)
        swell = ring(clicks, hz, soft_s) * 2 * np.log(1000) / (soft_s * SR)
        out += ring(swell, hz, t60)
    return out


def gulp():
    """Air squeezed by the closing valve: a tone climbs, holds and is choked."""
    t = np.arange(2000) / SR
    hz = GULP_TO_HZ + (GULP_FROM_HZ - GULP_TO_HZ) * np.exp(-t / GULP_RISE_S)
    choke = amp(-60 * np.maximum(t - GULP_HOLD_S, 0) / GULP_T60_S)
    return -np.sin(2 * np.pi * np.cumsum(hz) / SR) * (1 - np.exp(-t / 0.0014)) * choke


def valve_slams():
    """Two blows excite the valve body and spurt noise, with a gulp at the first; returns body and spurts."""
    slam_s, slam_db = np.transpose(VALVE_SLAMS)
    s = np.r_[slam_s, slam_s + BOUNCE_S]
    knock_db = np.r_[slam_db, slam_db + BOUNCE_KNOCK_DB]
    thump_db = np.r_[slam_db, slam_db + BOUNCE_THUMP_DB] + THUMP_DB
    spurt_db = np.r_[slam_db, slam_db + BOUNCE_SPURT_DB] + SPURT_DB
    body = struck(s, knock_db, KNOCK_MODES, .04) + struck(s, thump_db, THUMP_MODES, 0.096)
    for start, db in VALVE_SLAMS:
        add(body, start, amp(db + GULP_DB) * gulp())
    spurts = np.zeros((2, N))
    for start, db in zip(s, spurt_db):
        add(spurts, start, puff(2480, 0.0008, 0.12, 0.99, 0, 0.38) * amp(db))
    return body, spurts


def valve_drops():
    """The opening valve jolts its body; ticks and contacts ring the weights; returns body and rattle."""
    body, rattle = np.zeros(N), np.zeros((2, N))
    for start, level_db, jolt_db in VALVE_DROPS:
        body += struck([start], jolt_db, KNOCK_MODES, 0.05)
        body += struck([start], jolt_db + JOLT_DB, JOLT_MODES, 0.067)
        tick = puff(TICK_HZ, TICK_RISE_S, TICK_T60_S, 14.0, 5, .35)
        add(rattle, start, amp(level_db + TICK_DB) * tick)
    for start, db, t60, hz in WEIGHT_CONTACTS:
        add(rattle, start, amp(db) * puff(hz, CONTACT_RISE_S, t60, 16.0, 4, .5))
    no_bass = signal.butter(2, BRIGHT_FROM_HZ, "high", fs=SR, output="sos")
    rattle = signal.sosfilt(no_bass, rattle)
    return body, rattle + sum(amp(db) * ring(rattle, hz, t60) for hz, db, t60 in WEIGHT_MODES)


def scene():
    """Mixes water and bright metal through the port colours; body, lows and hum bypass them."""
    streams, babble = gush(), creek()
    bed = lows() + hum()
    near = bubbles() + splashes()
    slam_body, spurts = valve_slams()
    drop_body, rattle = valve_drops()
    body = slam_body + drop_body
    near += spurts + rattle
    hz, left_db, right_db = np.transpose(PORT_COLOUR)
    late_ms, path_db = np.transpose(GUSH_PATHS)
    direct = streams[:-2] * amp(path_db)[:, None]
    scattered = amp(SCATTERED_DB) * streams[-2:] + babble[1:]
    left = coloured(direct.sum(0) + near[0] + scattered[0] + babble[0], hz, left_db)
    # Every gush path and the common babble reach the right port with their own lag
    right = coloured(direct[0] + near[1] + scattered[1], hz, right_db, late_ms[0])
    for sound, ms in zip([*direct[1:], babble[0]], [*late_ms[1:], CREEK_LATE_MS]):
        right += coloured(sound, hz, right_db, ms)
    knocks = [amp(8.5) * body, amp(6.5) * np.roll(body, 5)]  # right is 5 samples later
    return np.array([left, right]) + knocks + bed


def record(dry):
    """The microphone loses the deepest bass, and the top is cut steeply."""
    thin = signal.sosfilt(signal.butter(4, 48, "high", fs=SR, output="sos"), dry)
    return signal.sosfilt(signal.cheby2(12, 70, CUTOFF_HZ, fs=SR, output="sos"), thin)


dry = scene()
out = record(dry)
master_out(out)
```